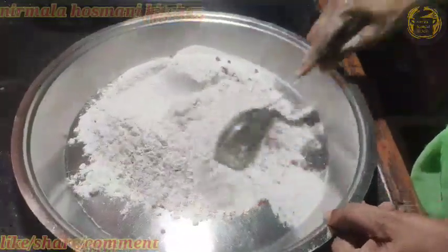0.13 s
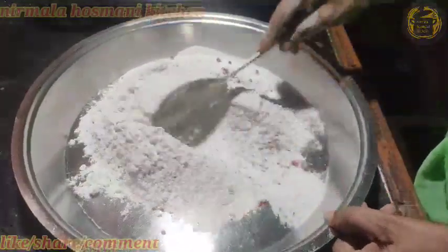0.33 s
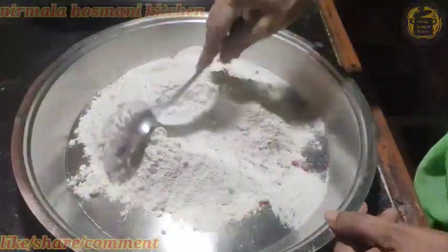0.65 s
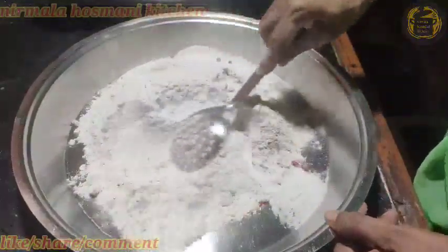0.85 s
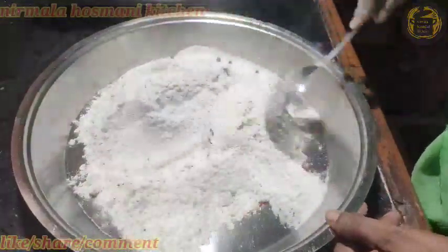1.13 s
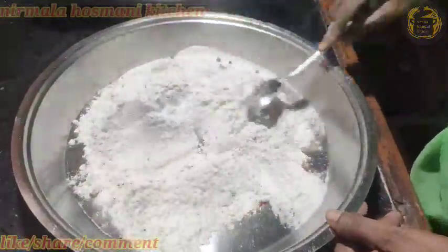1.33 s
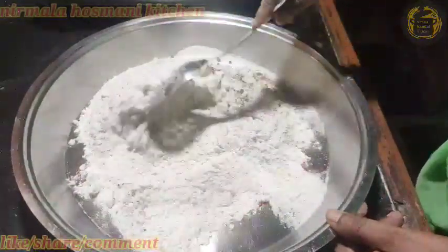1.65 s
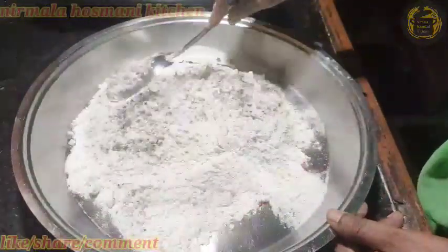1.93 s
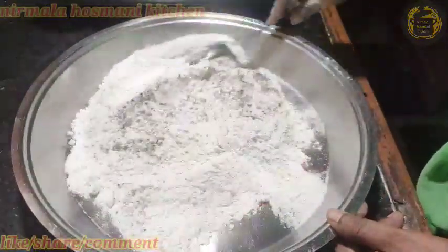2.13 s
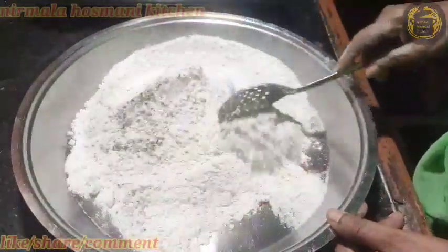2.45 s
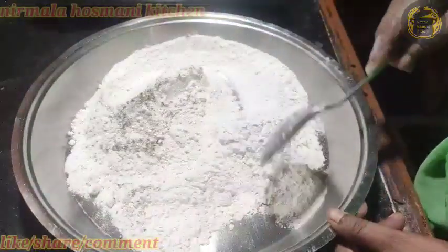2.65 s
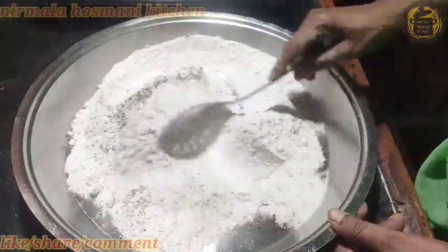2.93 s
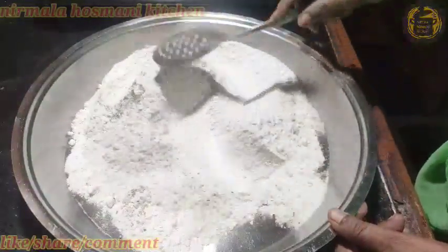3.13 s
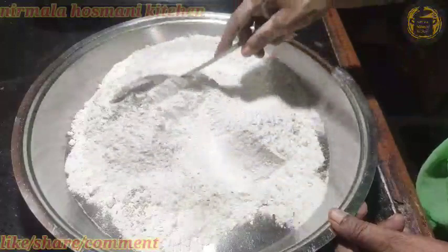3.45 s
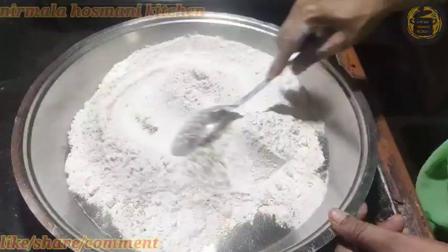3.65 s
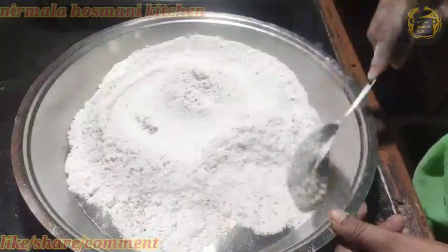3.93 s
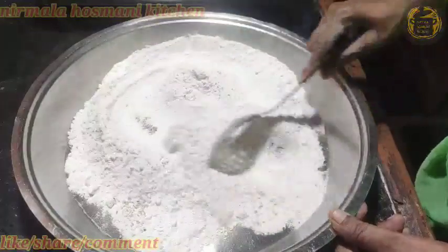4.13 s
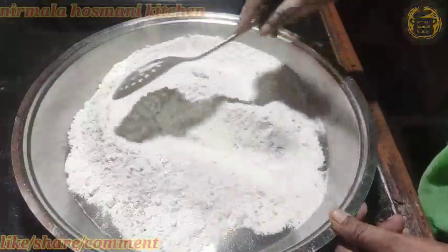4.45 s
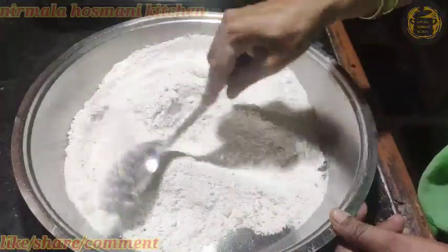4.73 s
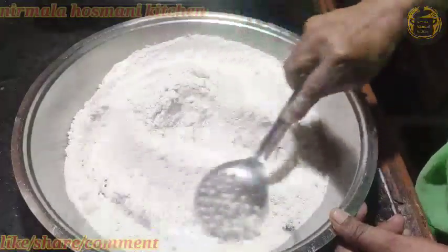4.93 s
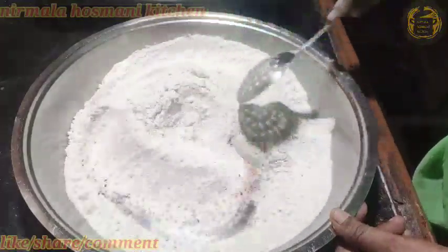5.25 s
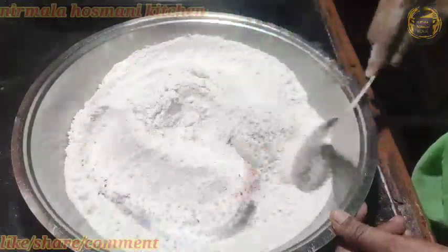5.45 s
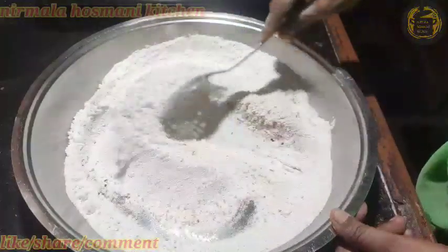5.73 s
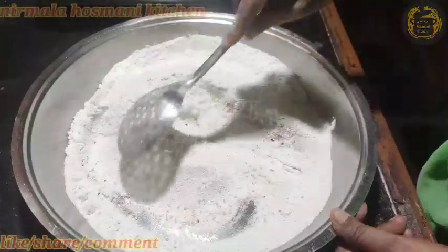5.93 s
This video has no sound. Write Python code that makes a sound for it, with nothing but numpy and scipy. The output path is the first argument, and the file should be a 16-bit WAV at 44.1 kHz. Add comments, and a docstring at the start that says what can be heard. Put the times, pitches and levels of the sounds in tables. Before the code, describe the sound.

Close stereo sound of a steel spoon working dry flour on a wide steel plate in a small, lightly echoing kitchen. A very faint ring dies away at 0 s, then the spoon lands with dull double knocks near 0.1 s and scrapes grittily until 0.35 s. Bangles clink high and thin around 0.5 and 0.7 s; a softer stroke runs from 0.8 to 1.0 s, with a faint thin tone. A brief swish leads to a hard knock at 1.34 s and the brightest, loudest hissing scrape, to 1.55 s. A slight tick and swish precede a longer, bumpy stroke at 2.07-2.45 s. A quiet scrape follows at 2.85 s, a strong thud at 3.45 s, and a higher, sharper knock at 4.08 s. Short strokes at 4.7, 5.03 and 5.5 s finish near 5.8 s. A low, wavering outdoor motor drone, rumble and soft hiss persist throughout.

```python
"""Throughout: a low motor drone from outside, its rumble, room air and microphone hiss (all filtered noise and sines).
At 0 s a faint ring dies away. From 0.08 s: a steel spoon digs into dry flour on a wide steel plate; it lands, and
bumps in mid-stroke, with damped knocks (decaying sines), and grit scrapes (patchy noise). Bangles clink near 0.5 and
0.7 s (high decaying modes), a thin tone peaks at 0.83 s, a noise tick falls near 2 s. The swung spoon swishes
(sliding noise band) up to 1.33, 2.07 and 4.08 s; the last stroke ends near 5.8 s. A small kitchen answers the plate,
bangles and tone; two microphone ports hear it all from close by."""
import sys
import numpy as np
from scipy import signal
from scipy.fft import rfft, irfft, next_fast_len
from scipy.io import wavfile
from scipy.ndimage import uniform_filter1d, map_coordinates

SR = 44100
rng = np.random.default_rng(int(sys.argv[2]) if len(sys.argv) > 2 else 0)


def digitize_waveform(pressure):
    """Quantize a signal to 16-bit integers and store it at the path in sys.argv[1].

    Rows of a 2-D input are taken as channels; values are limited to [-1, 1].
    """
    field = np.atleast_2d(pressure).T
    bounded = np.clip(field, -1, 1)
    quanta = np.round(bounded * 32767).astype(np.int16)
    wavfile.write(sys.argv[1], SR, quanta)


N = 268569

# Motor drone orders: (centre [Hz], width [Hz])
DRONE_ORDERS = [(39, 5.84), (78, 8.44), (143, 12)]
# Drone order levels before their waver: (time [s], low [dB], middle [dB], top [dB])
DRONE_LEVELS = [(0.0, -46.5, -54, -62), (0.41, -62, -57, -61), (0.92, -55, -53.5, -56.5),
                (1.49, -60.5, -54.5, -48.5), (2.03, -45.5, -55, -59), (2.49, -49.5, -53.5, -51.5),
                (3.14, -56, -59, -68), (3.51, -60, -55, -63), (3.85, -56, -59.5, -68),
                (4.49, -68, -57, -70.5), (5.43, -54, -63, -59), (5.63, -67, -54, -59),
                (6.09, -56, -64.5, -58)]
# Rumble spectrum: (frequency [Hz], relative density [dB])
RUMBLE_SPECTRUM = [(9, -53), (15, 6.5), (28, 8.5), (52, -6), (100, -7.5), (125, -5), (170, -5),
                   (250, -21.5), (600, -34.5), (800, -61), (1300, -120)]
# Room air and microphone hiss spectrum: (frequency [Hz], relative density [dB])
AIR_SPECTRUM = [(180, -20), (300, -2.5), (326, -4), (513, -9.5), (682, -7), (717, -5), (938, -13.5),
                (1190, -11), (5020, -19), (14900, -18.5), (16500, -23)]
# Left-right correlation: (frequency [Hz], correlation [-1..1])
AIR_CORRELATION = [(300, 0.38), (1000, 0.0), (16000, 0.028)]
RUMBLE_CORRELATION = [(30, 0.84), (600, 1.0)]
# Kitchen reverberation: (frequency [Hz], t60 [s])
KITCHEN_T60 = [(200, 0.6), (1000, 0.4), (4000, 0.4), (10000, 0.35), (16000, 0.25)]
# Air whistling through the spoon's holes: (landing time [s], centre at landing [Hz], level at landing [dB])
SWISHES = [(1.33, 1910, -56), (2.07, 1760, -62), (4.079, 1880, -66)]
# Faint ring dying away at 0 s, bangle contacts, noise tick near 2 s:
# (time [s], relative level [dB], ring gain [dB])
CLINKS = [(0, -62, 3), (0.46, -28, -10), (0.467, -34, 7), (0.472, -33, 7), (.478, -32, 0),
          (0.4875, -24, -7), (0.4923, -35, 4), (0.5, -50, -3), (.695, -43, 6.5), (1.995, -47, -18)]
# Bangle modes: (frequency [Hz], relative level [dB], t60 [s])
BANGLE_MODES = [(6780, -18, .14), (8040, -30, .08), (9890, -26, .06), (11100, -11, .05), (11920, -3, .06),
                (11965, -4, .06), (12870, -1, .07), (12960, 0, .07), (13380, -17, .05), (13850, -19, .05),
                (15020, -15, .1)]
# Spoon landings and bumps as it digs in mid-stroke:
# (time [s], drive [dB], knock [Hz], knock t60 [s], snap [Hz], relative snap level [dB])
KNOCKS = [(0.077, -25.5, 178, 0.043, 2320, -13), (0.107, -26.5, 278, 0.06, 1200, -4),
          (0.772, -26.5, 410, 0.015, 1840, -10.5), (1.337, -11.5, 312, 0.013, 2370, -15.5),
          (2.064, -27, 302, 0.039, 2010, -27), (2.278, -29.5, 470, 0.058, 1250, -2),
          (2.413, -33.5, 386, 0.063, 1020, -4), (2.848, -22.5, 294, 0.056, 1360, -36),
          (3.447, -7, 335, 0.015, 1100, -16), (3.584, -27.5, 279, 0.062, 1350, -20),
          (4.074, -10, 783, 0.025, 1266, -10), (4.716, -21.5, 406, 0.025, 1620, -34),
          (5.033, -28.5, 504, 0.015, 1070, -26), (5.164, -38, 302, 0.04, 1770, -3),
          (5.511, -22, 165, 0.069, 1360, -50), (5.68, -34.5, 435, 0.029, 1500, -17)]
# Flour-damped plate modes: (frequency [Hz], relative level [dB], t60 [s])
PLATE_MODES = [(287, -9, 0.1), (429, 3.5, 0.021), (728, -7.5, 0.046), (1080, -6, 0.0043),
               (1320, -7.5, 0.022), (2460, -23.5, 0.036)]
# Strokes, one list each: (time [s], grit hiss level [dB], plate body over hiss [dB])
STROKES = [
    [(0.084, -40, 2), (0.096, -44.5, -10), (0.104, -42, -15), (0.112, -35.5, -1.5), (0.128, -34.5, -10),
     (0.168, -42, -9), (0.298, -40, -0.5), (0.355, -47.5, 4.5)],
    [(0.778, -56, 8), (0.786, -47, -1.5), (0.82, -45.5, -10.5), (0.862, -51.5, -9.5), (0.916, -40.5, -10),
     (0.976, -46.5, -16), (1.006, -44, -5), (1.02, -51, -4)],
    [(1.354, -34, -4), (1.396, -42.5, -15), (1.414, -25, -27), (1.44, -24.5, -30), (1.484, -28, -24),
     (1.52, -32, -10), (1.528, -35, -12.5), (1.56, -46, 4)],
    [(2.074, -45, -3), (2.08, -43, -1.5), (2.232, -40.5, -13), (2.258, -45, -1), (2.32, -36.5, -5),
     (2.364, -43, -6), (2.442, -37, -3), (2.455, -44.5, -13)],
    [(2.863, -56, 8), (2.877, -46, -8), (2.917, -46, 0), (2.967, -43, -21), (3.001, -49.5, 2),
     (3.011, -48, -17), (3.069, -50, -2.5), (3.085, -55, 4)],
    [(3.463, -42.5, 12), (3.473, -38.5, 3.5), (3.485, -41, -3), (3.519, -45, -1), (3.551, -43, -9),
     (3.593, -44, 3.5), (3.625, -42, -13), (3.64, -48.5, 1)],
    [(4.092, -46, 10), (4.126, -39.5, -10.5), (4.192, -43, -8), (4.226, -40.5, -7.5), (4.244, -36.5, -5.5),
     (4.28, -45.5, 3)],
    [(4.731, -41.5, 3), (4.759, -49.5, -9), (4.771, -52, -10), (4.837, -52, -12), (4.871, -54.5, -10),
     (4.915, -40, -11), (4.951, -47, -6), (4.97, -41, -8.5)],
    [(5.03, -45, 9.5), (5.038, -48.5, -4), (5.056, -42, -6.5), (5.138, -39, -25.5), (5.162, -38, -2.5),
     (5.174, -38.5, -14), (5.19, -51.5, 5)],
    [(5.524, -47.5, 11.5), (5.558, -42.5, -18.5), (5.604, -36, -7.5), (5.64, -39.5, -22), (5.676, -37, -12),
     (5.682, -35, -10.5), (5.736, -45, -0.5), (5.75, -63.5, 9)],
]
# Scrape spectra of grit hiss, rasp and plate body: (frequency [Hz], relative density [dB])
GRIT_SPECTRUM = [(1760, -37), (3000, -5.5), (3700, -7.5), (3890, -11.5), (4170, -3.5), (4700, -3.5),
                 (5600, -7), (6390, -4.5), (8520, -3.5), (9460, -2.5), (14800, -7), (16000, -49)]
RASP_SPECTRUM = [(590, -7), (1000, -6), (1980, 3), (2580, -1.5), (3160, -5), (3440, -20), (3800, -3),
                 (4940, -8), (8360, -120)]
BODY_SPECTRUM = [(120, -10.5), (200, -25.5), (231, -13), (270, -3), (370, -4.5), (481, -2.5), (589, -6),
                 (896, -4), (1200, -9.5), (1560, -7), (2640, -120)]
# Left-right correlation of the scrape: (frequency [Hz], correlation [-1..1])
SCRAPE_CORRELATION = [(60, .95), (200, .94), (400, .7), (700, .22), (1500, .08), (4000, 0), (16000, 0)]

WAVER_DB = 3  # each drone order swells and sinks by itself
AIR_DB, RUMBLE_AT_MEAN_DRONE_DB = -62.5, -51
RUMBLE_FOLLOWS = 0.77  # dB per dB of drone swing
TONE_HZ, TONE_DB = 2977, -57  # before drift and flicker
TONE_FULL_S, TONE_HOLD_S = 0.83, 0.085
TONE_RISE_DB_PER_S, TONE_FADE_DB_PER_S = 170, 60
SWISH_DB_PER_S, SWISH_HZ_PER_S = 94, 2200  # louder and higher as the swing speeds up
SWISH_STOP_DB_PER_S = 700  # cut short on landing
TICK_AT_0_DB, TICK_DB_PER_DRIVE_DB = -26.5, 0.45
RASP_DB, RASP_FOLLOWS = -4, 0.3  # over hiss; dB per dB of plate body
ROAM_DB = 2.5  # the spoon's edge wanders between the ports
LIFT_S, LIFT_DB = 0.035, 23  # fade time and depth as the spoon lifts
TOP_HZ = 16650


def amp(db):
    """Amplitude ratio of a level in dB."""
    return 10 ** (np.asarray(db) / 20)


def unit(x):
    """Scale to rms 1 over all channels."""
    return x / np.sqrt(np.mean(x ** 2) + 1e-20)


def along(points, hz):
    """Interpolate (frequency [Hz], value) points on a log frequency axis."""
    f, v = np.transpose(points)
    return np.interp(np.log(hz + 1), np.log(f + 1), v)


def curves(rows):
    """One value per sample for each column after the time."""
    s, *cols = np.transpose(rows)
    return [np.interp(np.arange(N) / SR, s, c) for c in cols]


def wobble(rate_hz):
    """Smooth random curve through rate_hz normal knots per second."""
    knots = rng.standard_normal(int(N * rate_hz / SR) + 4)
    return map_coordinates(knots, [np.arange(N) * rate_hz / SR])


def filtered(x, response):
    """Multiply the spectrum of x by a response of frequency in Hz."""
    m = next_fast_len(N + SR // 2)
    return irfft(rfft(x, m) * response(np.fft.rfftfreq(m, 1 / SR)), m)[..., :N]


def rush(spectrum, correlation, patchy_db, shape=1):
    """Stereo noise of rms 1 in time-frequency patches of random gain; shape is its fine grain in time."""
    z = signal.stft(shape * rng.standard_normal((2, N)), nperseg=512)[2]
    field = rng.standard_normal(z.shape[1:])
    field = uniform_filter1d(field, size=5, axis=0)
    field = uniform_filter1d(field, size=6, axis=1)
    pair = signal.istft(z * amp(patchy_db * unit(field)), nperseg=512)[1][:, :N]

    def mid_side_response(hz):
        angle = np.arccos(np.clip(along(correlation, hz), -1, 1)) / 2
        return amp(along(spectrum, hz)) * [np.cos(angle), np.sin(angle)]

    mid, side = filtered(pair, mid_side_response)
    return unit(np.array([mid + side, mid - side]))


def ring(modes, t, spread_db):
    """One blow: decaying sine modes, each at a new random strength."""
    return sum(amp(db + rng.normal(0, spread_db) - 60 * t / t60) * np.sin(2 * np.pi * hz * t)
               for hz, db, t60 in modes)


def grains(rate_hz, spread_db):
    """Sparse clicks of unequal size, smeared over about a millisecond, rms 1."""
    size_db = spread_db * np.minimum(rng.exponential(size=N), 2.5)
    clicks = (rng.random(N) < rate_hz / SR) * amp(size_db)
    return unit(uniform_filter1d(clicks, size=50))


def background():
    """Drone orders as unsteady sines plus narrow noise, over rumble; room air and microphone hiss above."""
    orders_db = curves(DRONE_LEVELS)
    drone_db = np.mean(orders_db, axis=0)
    out = amp(AIR_DB) * rush(AIR_SPECTRUM, AIR_CORRELATION, patchy_db=2.5)
    rumble_db = RUMBLE_AT_MEAN_DRONE_DB + RUMBLE_FOLLOWS * (drone_db - drone_db.mean())
    out = out + amp(rumble_db) * rush(RUMBLE_SPECTRUM, RUMBLE_CORRELATION, patchy_db=1.0)
    for (hz, width_hz), level_db in zip(DRONE_ORDERS, orders_db):
        sine = np.sin(2 * np.pi * np.cumsum(hz + 0.5 * width_hz * wobble(7)) / SR)
        band = filtered(rng.standard_normal(N), lambda f: np.exp(-((f - hz) / width_hz) ** 2))
        order = unit(sine + 0.66 * unit(band) * [[1.1], [0.8]])
        level_db = level_db + WAVER_DB * wobble(3.6)
        out = out + amp(level_db + [[0.6], [-0.6]]) * order
    return out


def kitchen(x):
    """Walls answer with noise tails, new for each third of a second; each frequency has its own decay."""
    out, step = np.zeros((2, N + 2 * SR)), SR // 3
    for i in range(0, N, step):
        hz, t, z = signal.stft(rng.standard_normal((2, SR // 2)), SR, nperseg=256)
        decay = amp(-60 * t / along(KITCHEN_T60, hz)[:, None])
        tail = signal.istft(z * decay, SR, nperseg=256)[1]
        wet = signal.fftconvolve(x[None, i:i + step], tail / np.linalg.norm(tail[0]), axes=1)
        out[:, i + 200:][:, :wet.shape[1]] += wet  # 200 samples of predelay
    left, right = out[:, :N]
    mid = (left + right) / 2
    # long waves reach both ports alike
    side = filtered((left - right) / 2, lambda hz: np.clip(hz / 800, 0, 1) ** 2)
    return np.array([mid + side, mid - side])


def thin_tone():
    """Faint, nearly steady sine that swells, holds and fades while flickering in strength."""
    phase = 2 * np.pi * np.cumsum(TONE_HZ + 6 * wobble(12)) / SR
    after_s = np.arange(N) / SR - TONE_FULL_S
    rise_db = TONE_RISE_DB_PER_S * after_s
    fade_db = TONE_FADE_DB_PER_S * (TONE_HOLD_S - after_s)
    level_db = TONE_DB + np.minimum(0, np.minimum(rise_db, fade_db))
    return amp(level_db + 3.5 * wobble(60)) * np.sin(phase)


def swish():
    """Air through the spoon's holes: low noise carried on a rising centre frequency."""
    out = 0
    for s, hz, db in SWISHES:
        after_s = np.arange(N) / SR - s
        flutter = filtered(rng.standard_normal((2, N)), lambda f: np.exp(-(f / 200) ** 2))
        phase = 2 * np.pi * np.cumsum(hz + SWISH_HZ_PER_S * after_s) / SR
        level_db = db + np.minimum(SWISH_DB_PER_S * after_s, -SWISH_STOP_DB_PER_S * after_s)
        out = out + amp(level_db) * unit(flutter * np.sin(phase))
    return out


def bangles():
    """Thin metal rings on the wrist: noise ticks and high modes in varying balance, nearer the left port."""
    out, t = np.zeros((2, N + SR)), np.arange(SR // 2) / SR
    for s, db, ring_db in CLINKS:
        tick = amp(-60 * t / 0.031) * np.diff(rng.standard_normal((2, len(t) + 3)), n=3) / 2
        glance = 1 - np.exp(-t / 0.00071)  # soft onset: the rings glance off each other rather than strike
        left = ring(BANGLE_MODES, t, spread_db=2.5)
        right = -ring(BANGLE_MODES[::2], t, spread_db=3.5)
        rings = amp(ring_db) * np.array([left, right])
        rings[1] += 0.38 * rings[0]  # the far port hears the modes in another balance
        out[:, round(s * SR):][:, :len(t)] += amp(db) * glance * (rings + 1.14 * tick)
    return out[:, :N] * amp([[1.5], [-1.5]])


def knocks():
    """Landings and mid-stroke bumps: the edge ticks in the flour; 1 ms later knock, muffled modes and snap."""
    out, t = np.zeros((2, N + SR)), np.arange(SR // 4) / SR
    for s, db, hz, t60, snap_hz, snap_db in KNOCKS:
        push = amp(-60 * t / t60) * np.sin(2 * np.pi * hz * t)
        snap = amp(snap_db + 8.5 - 60 * t / 0.01) * np.sin(2 * np.pi * snap_hz * t)
        onset = 1 - np.exp(-t / 0.00086)
        knock = (push + amp(-7.5) * ring(PLATE_MODES, t, spread_db=3.0)) * onset + snap
        noise = signal.lfilter([1, -0.35], 1, rng.standard_normal((2, len(t))))
        tick = amp(-60 * t / 0.053) * noise
        tick_db = TICK_AT_0_DB + TICK_DB_PER_DRIVE_DB * db
        out[:, round((s + 0.0032) * SR):][:, :len(t)] += amp(db - 3.5) * knock
        out[:, round((s + 0.0022) * SR):][:, :len(t)] += amp(tick_db) * tick
    low_cut = signal.butter(4, 120, "high", fs=SR, output="sos")  # the plate radiates no deep bass
    return signal.sosfilt(low_cut, out[:, :N])


def scrape():
    """Grit catches and slips under the spoon's edge, hissing in the thin steel and shaking the plate."""
    t = np.arange(N) / SR
    strokes = []
    for rows in STROKES:
        end_s, end_db, end_body_db = rows[-1]
        strokes.append([*rows, (end_s + LIFT_S, end_db - LIFT_DB, end_body_db)])
    touch = sum((t >= rows[0][0]) & (t < rows[-1][0]) for rows in strokes)
    touch = uniform_filter1d(1.0 * touch, size=300)
    hiss_db, body_db = curves([row for rows in strokes for row in rows])
    pan_db = ROAM_DB * wobble(12)
    fine = amp(1.46 * wobble(60) + 0.61 * wobble(600))  # clumps of fine grains, shared by all bands
    coarse = grains(rate_hz=220, spread_db=3)  # bigger lumps crunch, more in the plate than in the treble
    hiss = rush(GRIT_SPECTRUM, SCRAPE_CORRELATION, patchy_db=2.2, shape=fine + 0.18 * coarse)
    rasp = rush(RASP_SPECTRUM, SCRAPE_CORRELATION, patchy_db=2.5, shape=fine + 0.6 * coarse)
    body = rush(BODY_SPECTRUM, SCRAPE_CORRELATION, patchy_db=2.0, shape=fine + 0.45 * coarse)
    layers = hiss + amp(RASP_DB + RASP_FOLLOWS * body_db) * rasp + amp(body_db) * body
    return touch * amp(hiss_db + [pan_db / 2, -pan_db / 2]) * layers


def scene():
    """Plate, spoon and thin tone fill the room; the bangles' high ring is absorbed more."""
    plate = scrape() + knocks() + thin_tone()
    wrist = bangles()
    room = kitchen(amp(-6.5) * plate[0] + amp(-12) * wrist[0])
    return plate + wrist + room + swish() + background()


def record(dry):
    """The treble falls 36 dB around 15.6 kHz and ends at the band limit."""
    return filtered(dry, lambda hz: (hz < TOP_HZ) * amp(-36 / (1 + np.exp((15600 - hz) / 70))))


dry = scene()
out = record(dry)
digitize_waveform(out)
```